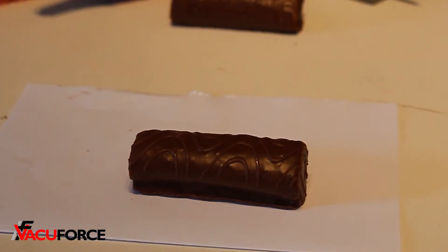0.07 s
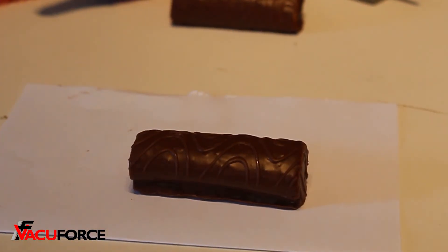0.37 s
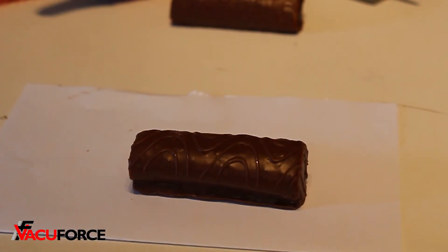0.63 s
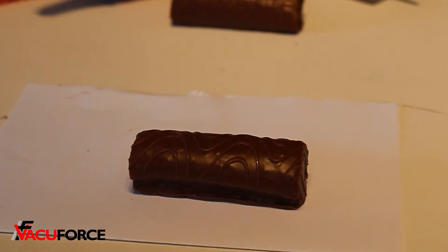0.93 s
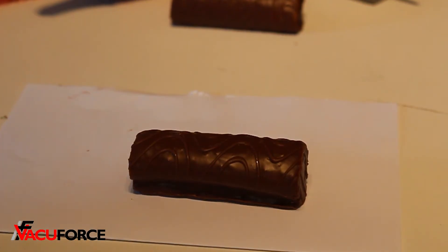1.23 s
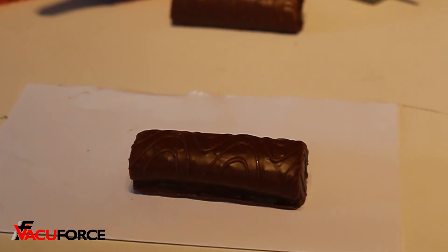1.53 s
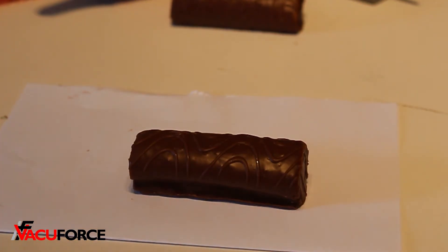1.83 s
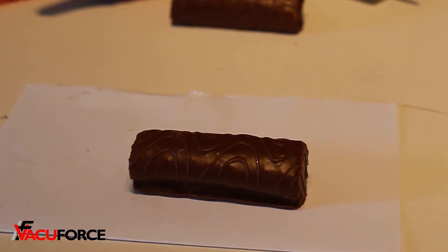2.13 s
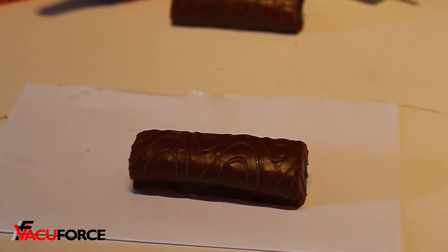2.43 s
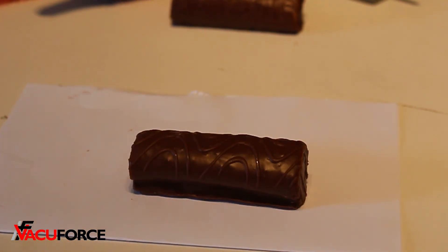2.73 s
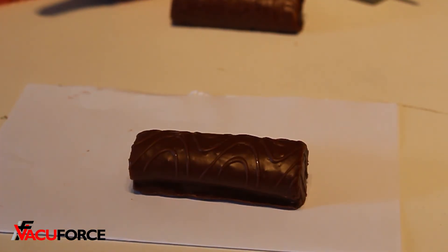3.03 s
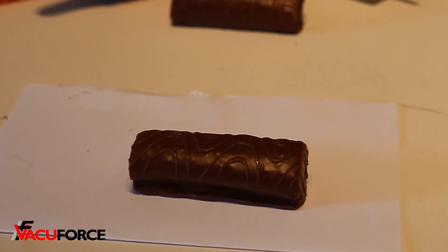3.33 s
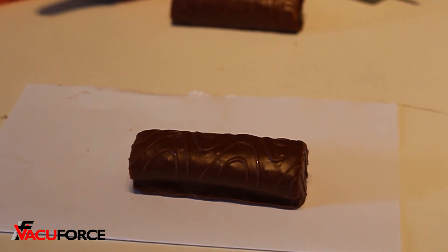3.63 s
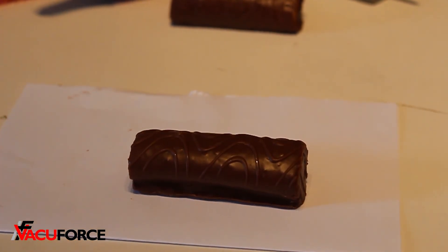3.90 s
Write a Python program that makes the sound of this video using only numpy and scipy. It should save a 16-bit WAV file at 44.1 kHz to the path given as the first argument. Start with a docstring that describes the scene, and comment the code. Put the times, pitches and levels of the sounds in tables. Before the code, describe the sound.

A small vacuum pump runs steadily for the whole four seconds in a hard-walled room. Its low throbbing hum is joined by a wide hiss of rushing air, a fine rattle, rapid valve chatter and light ringing from the metal casing. A faint high whistle wanders up and down in the hiss. At about 2 seconds the buzz becomes slightly firmer, while the loudness stays even.

```python
"""A small diaphragm vacuum pump hums steadily in a hard-walled room.
Two strokes per shaft turn force a throbbing harmonic series, whose buzz firms up midway.
Rushing air and a fine rattle give broadband noise and ring the resonances of the metal casing.
The valves chatter once a turn, and a faint whistle wanders in the hiss.
Diffuse reflections from the walls spread the treble wide."""
import sys
import numpy as np
from scipy import signal
from scipy.fft import rfft, irfft
from scipy.io import wavfile
from scipy.ndimage import uniform_filter1d

SR = 44100
rng = np.random.default_rng(int(sys.argv[2]) if len(sys.argv) > 2 else 0)


def inscribe(sig):
    """Save sig as 16-bit PCM at rate SR to the path in sys.argv[1].

    A 1-D sig is mono; a 2-D sig holds one channel per row.
    Samples are clipped to [-1, 1] before scaling.
    """
    pcm = np.round(np.clip(np.atleast_2d(sig).T, -1, 1) * 32767)
    wavfile.write(sys.argv[1], SR, pcm.astype(np.int16))


N = 176400
TIME_S = np.arange(N) / SR
FREQ_HZ = np.arange(N // 2 + 1) * SR / N
SHAFT_HZ = 28.584

# Line spectrum of the pump (harmonic number [1], relative level [dB], change once firm [dB])
SHAFT_HARMONICS = [(1, -30, 0), (2, -6.5, 0.5), (3, -13, 0), (4, 1, 0.5), (5, 0.75, 0), (6, 0.5, -1.5),
                   (7, -13.5, 0), (8, -47, -31), (9, -5, 1.5), (10, -10, 1.5), (11, 2.5, -1), (12, -7, 0.5),
                   (13, -31, 18.5), (14, -2.5, -0.5), (15, -23.5, 3.5), (16, -33, 20.5), (17, -31, 15.5),
                   (18, -12.5, 3), (20, -28, 9), (21, -26.5, 6), (22, -17, -3), (25, -17.5, 1),
                   (28, -15, -0.5), (30, -10, 0), (31, -22, 9), (32, -13.5, 5.5), (33, -9, 6.5),
                   (34, -24, -1)]

def pump_hum(turns, firmness, flutter=0.011):
    """Periodic forcing: shaft harmonics superpose into a thump and, half a turn on, a knock and buzz."""
    hum = 0
    for k, db, change_db in SHAFT_HARMONICS:
        if k < 8:  # thump, its odd harmonics lagging
            delay_s, dispersion_rad = .0013 + .0013 * (k % 2), 0
        elif k < 28:  # knock, smeared about the tenth harmonic
            delay_s, dispersion_rad = .0175, .48 * (k - 10) ** 2
        else:  # valve buzz
            delay_s, dispersion_rad = .0185, 0
        phase = 2 * np.pi * k * (turns - delay_s * SHAFT_HZ) - dispersion_rad
        amplitude = undb(db + change_db * firmness) * (1 + flutter * k * drift(5.4))
        hum = hum - amplitude * np.cos(phase)
    return at_level(hum, db=-27) * pan(-2.5)


# Spectrum of the air rush (frequency [Hz], relative spectral level [dB])
AIR_SPECTRUM = [(25, -25), (70, -22), (130, -9.5), (200, -8.5), (330, -8.5), (420, -8.5), (700, -13.5),
                (1000, -6), (1700, -6), (2300, -5), (2800, -1.5), (3500, -2.6), (4200, -0.1), (5000, 0.8),
                (5500, -1.3), (6500, -9), (7500, -11), (8900, -8.5), (10000, -20.5), (11000, -21),
                (12500, -20), (14000, -28), (15800, -28)]

def air_rush(ticks_per_s=1500, rattle_share=0.23):
    """Broadband noise: hiss and a rattle of random impulses add in power, over a late reverberant wash."""
    ticks = (rng.random(N) < ticks_per_s / SR) * rng.standard_normal(N)
    hiss = rng.standard_normal(N)
    rush = np.sqrt(1 - rattle_share) * hiss + np.sqrt(rattle_share) * at_level(ticks, db=0)
    wash = sound_field(rfft(rng.standard_normal(N)), rfft(rng.standard_normal((2, N))))
    return at_level(colour(room(rush) + undb(-11) * wash, AIR_SPECTRUM), db=-21)


# Casing modes (frequency [Hz], bandwidth [Hz], relative level [dB], change once firm [dB])
CASING_MODES = [(934, 50, -3, 1), (1344, 19, 0.5, 1.5), (2410, 16, -19.5, 22), (2723, 13, 4, 3.5),
                (2816, 11, -3, 6.5), (3364, 18, 2, 1.5), (3610, 8.8, 3, 0), (3950, 19, 3.5, -5),
                (4030, 9.7, 1.5, -11), (4430, 14, 4, -14), (4770, 22, 7, -19), (4960, 40, -1, -0.5),
                (5135, 13, -4.5, 6), (5375, 11, 3.5, 3.5), (6100, 9.6, -19, 0), (9250, 27, -23, -4),
                (9200, 24, -24, 0), (9990, 28, -6.5, 1)]

def casing_ring(firmness, waver_db=.9):
    """Resonance: random excitation sustains the narrow modes of the metal, each swelling on its own."""
    modes = 0
    for centre_hz, width_hz, db, change_db in CASING_MODES:
        excitation = rng.standard_normal(N) + rng.standard_normal((2, N))
        ring = irfft(rfft(excitation) / (1 + 2j * (FREQ_HZ - centre_hz) / width_hz), N)
        modes = modes + at_level(ring, db) * undb(change_db * firmness + waver_db * drift(4.47))
    return at_level(modes, db=-31.5)


# Spectrum of the valve chatter (frequency [Hz], relative spectral level [dB])
VALVE_SPECTRUM = [(300, -45), (700, -16), (950, 1.5), (1300, 0), (1600, -9), (2200, 0.5), (3200, -19.5),
                  (6000, -30.5)]
# Envelope of the valve chatter (time [s], relative level [dB])
VALVE_ENVELOPE = [(0, -5), (.2, -1.5), (.36, 1), (.48, -1), (.64, 3), (.8, -3.5), (1.03, -2), (1.2, -8.5),
                  (1.37, -1), (1.47, -4), (1.582, 1.5), (1.75, -0.5), (1.9, -1), (2.7, -7), (3.1, -2.5),
                  (3.45, -2), (3.7, -3), (3.92, 0.5)]

def valve_chatter(turns, delay_s=0.018, sharpness=.9, waver_db=.5):
    """Amplitude modulation: the valves release one puff of noise per turn, uneven in strength."""
    gate = np.exp(sharpness * np.cos(2 * np.pi * (turns - delay_s * SHAFT_HZ)))
    strength_db = np.interp(TIME_S, *np.array(VALVE_ENVELOPE).T) + waver_db * drift(24)
    puffs = gate * rng.standard_normal(N) * undb(strength_db)
    return at_level(colour(puffs, VALVE_SPECTRUM), db=-34)


# Course of the whistle (time [s], centre frequency [Hz], relative level [dB])
WHISTLE_GLIDE = [(0, 5000, -10), (.25, 4800, -1), (.48, 4180, 0), (.7, 4200, -12), (1.0, 5200, -11),
                 (1.13, 5100, 2), (1.271, 4700, -6), (1.42, 4450, 0), (1.6, 4450, -23), (2.2, 5200, -4),
                 (2.48, 4850, 3), (2.619, 5400, -6), (2.8, 5480, -3), (2.96, 4900, 2), (3.1, 5400, -11),
                 (3.35, 5700, -7), (3.55, 4400, -12), (3.751, 4200, 2), (3.95, 4850, 1)]

def air_whistle(width_hz=260):
    """Narrowband noise: a thin band of rushing air is heard as a pitch at its sliding centre."""
    times, centre_hz, db = np.array(WHISTLE_GLIDE).T
    noise = rfft(rng.standard_normal((2, 2, N)))
    in_phase, quadrature = irfft(noise / (1 + (2 * FREQ_HZ / width_hz) ** 2), N)
    phase = 2 * np.pi * np.cumsum(np.interp(TIME_S, times, centre_hz)) / SR
    band = in_phase * np.cos(phase) + quadrature * np.sin(phase)
    return at_level(band, db=-33.5) * undb(np.interp(TIME_S, times, db))


def room(x, t60_s=0.32):
    """Reverberation: dense reflections decay exponentially, uncorrelated left and right."""
    tails = rng.standard_normal((2, N)) * np.exp(-np.log(1000) * TIME_S / t60_s)
    tails = tails / np.sqrt(np.sum(tails ** 2, axis=1, keepdims=True))
    return sound_field(rfft(x), rfft(x) * rfft(tails))


# Reverberant-to-direct ratio (frequency [Hz], ratio [dB])
REVERBERANT_RATIO = [(200, -22), (600, -7), (1400, -2), (3000, -2), (5000, 10.5), (12000, 13)]

def sound_field(direct, reflected, left_lag_s=.000045):
    """Superposition: the direct spectrum, slightly later on the left, adds to the reflected one."""
    ratio = undb(per_frequency(REVERBERANT_RATIO))
    lag = np.exp(-2j * np.pi * FREQ_HZ * np.array([[left_lag_s], [0]]))
    return irfft((direct * lag + ratio * reflected) / np.hypot(1, ratio), N)


def undb(db):
    """Decibel law: 20 dB is a tenfold amplitude."""
    return 10 ** (np.asarray(db) / 20)


def at_level(x, db):
    """Normalisation to an rms level."""
    return x * undb(db) / np.sqrt(np.mean(x ** 2))


def pan(left_minus_right_db):
    """Level difference, split evenly into left and right gains."""
    return undb(left_minus_right_db * np.array([[1], [-1]]) / 2)


def per_frequency(points):
    """Interpolation of a table along a logarithmic frequency axis."""
    hz, value = np.array(points, float).T
    return np.interp(np.log(FREQ_HZ + 1e-9), np.log(hz), value)


def colour(x, points):
    """Linear filtering by a (frequency [Hz], gain [dB]) table."""
    return irfft(rfft(x) * undb(per_frequency(points)), N)


def drift(steps_per_s):
    """Slow fluctuation: smoothed random steps of unit rms."""
    span = int(SR / steps_per_s)
    steps = np.repeat(rng.standard_normal(400)[:N // span + 1], span)
    return at_level(uniform_filter1d(uniform_filter1d(steps, span), span)[:N], db=0)


# Envelope of the air flow (time [s], relative level [dB])
FLOW_ENVELOPE = [(0, -25.5), (.2, -24), (.55, -24), (.7, -24.5), (.78, -25), (.92, -24), (1.15, -24.5),
                 (1.5, -25), (1.921, -25), (2.05, -24), (2.2, -24.5), (2.42, -24.5), (2.679, -25),
                 (2.78, -23.5), (3.1, -25), (3.279, -24), (3.65, -24), (3.95, -24.5)]
# Stereo balance of all but the hum (frequency [Hz], left minus right level [dB])
NOISE_BALANCE = [(600, -0.5), (1300, -2.5), (2400, -4.5), (4400, -3.5), (8100, -1.7), (15000, 0)]

def scene(speed_wander=0.00032, firm_at_s=1.94, firm_rise_s=0.28, flow_waver_db=0.3):
    """Common modulation: the shaft times hum and valves; the air flow sways rush and ringing."""
    turns = np.cumsum(SHAFT_HZ * (1 + speed_wander * drift(1.975))) / SR
    firmness = (1 + np.tanh((TIME_S - firm_at_s) / firm_rise_s)) / 2
    times, db = np.array(FLOW_ENVELOPE).T
    flow = undb(np.interp(TIME_S, times, db - db.mean()) + flow_waver_db * drift(12))
    noise = flow * (air_rush() + casing_ring(firmness)) + air_whistle() + room(valve_chatter(turns))
    noise = irfft(rfft(noise) * pan(per_frequency(NOISE_BALANCE)), N)
    return pump_hum(turns, firmness) + noise


def record(dry, cutoff_hz=15780, mute_at_s=3.977, mute_db=-44):
    """Gating and band limiting: the sound mutes at the very end, and a steep low-pass cuts the top."""
    gate = np.clip((mute_at_s - TIME_S) / .002, undb(mute_db), 1)
    low_pass = signal.ellip(12, .1, 80, cutoff_hz, fs=SR, output="sos")
    return signal.sosfilt(low_pass, dry * gate)


dry = scene()
out = record(dry)
inscribe(out)
```